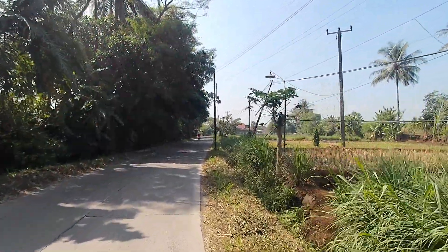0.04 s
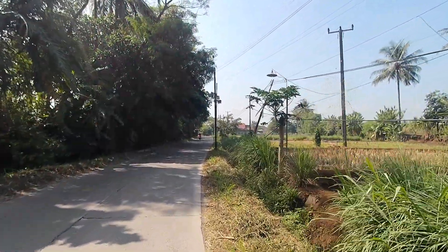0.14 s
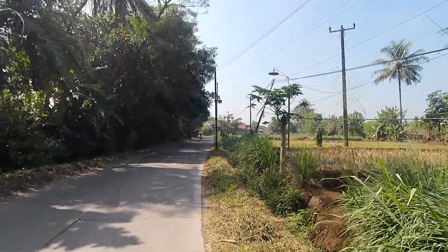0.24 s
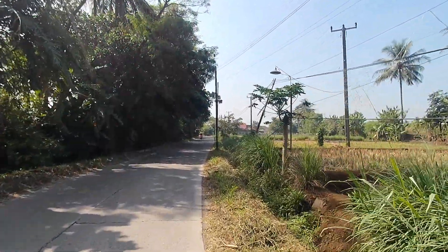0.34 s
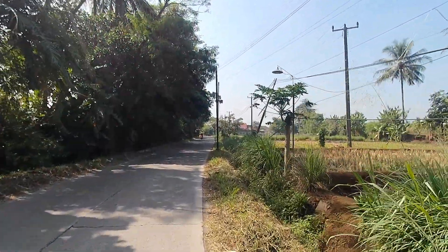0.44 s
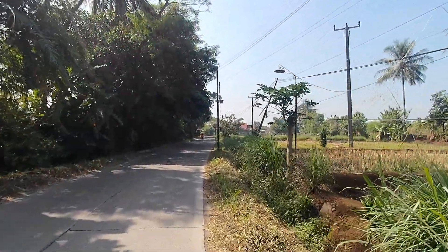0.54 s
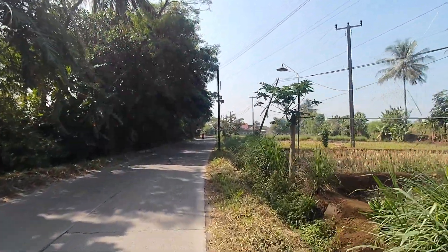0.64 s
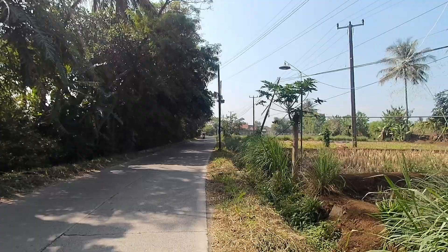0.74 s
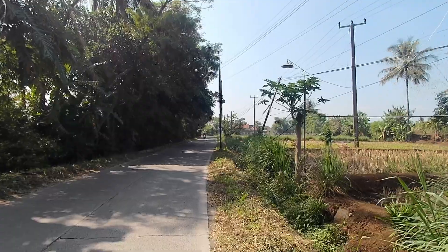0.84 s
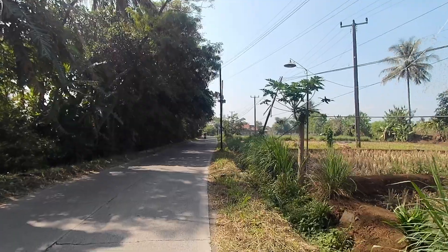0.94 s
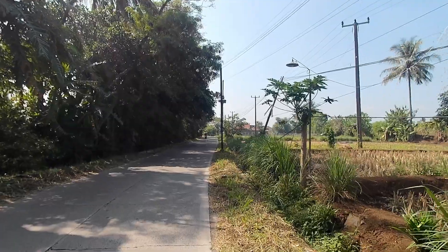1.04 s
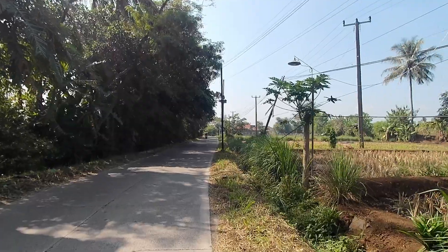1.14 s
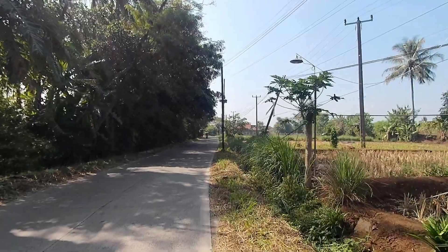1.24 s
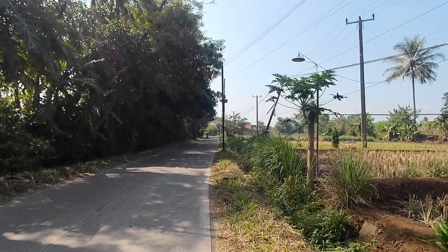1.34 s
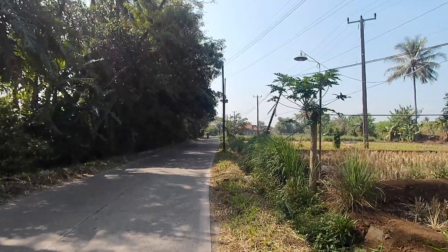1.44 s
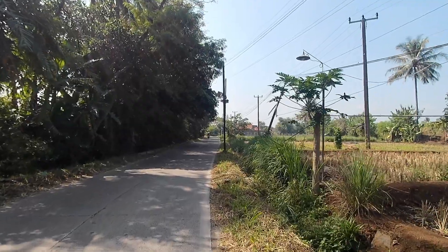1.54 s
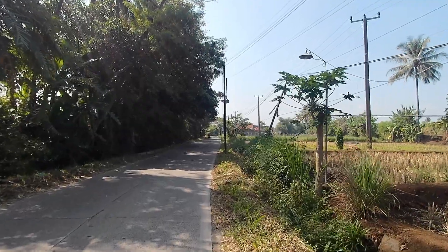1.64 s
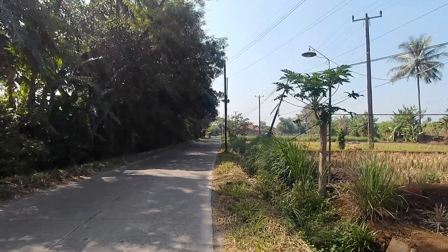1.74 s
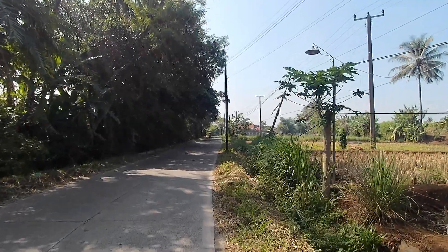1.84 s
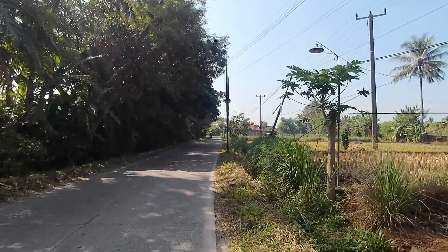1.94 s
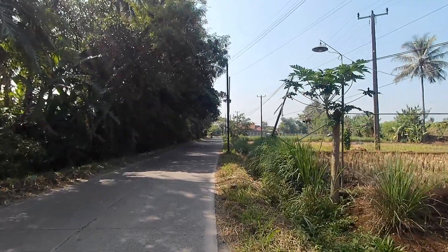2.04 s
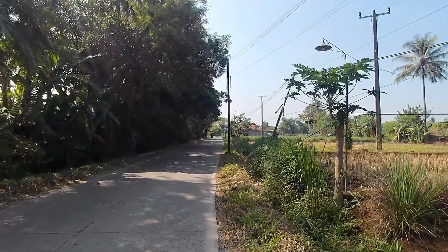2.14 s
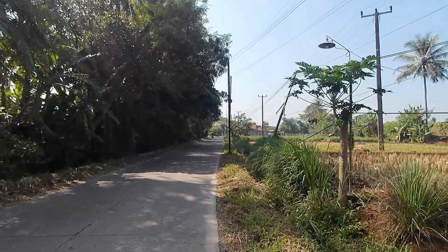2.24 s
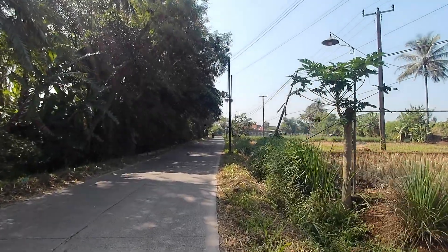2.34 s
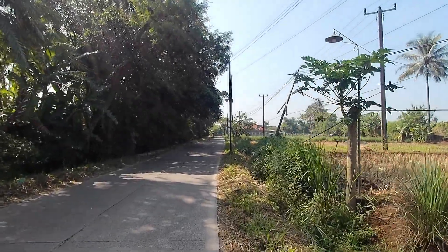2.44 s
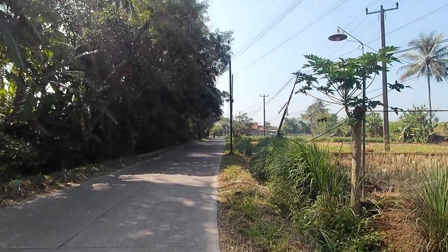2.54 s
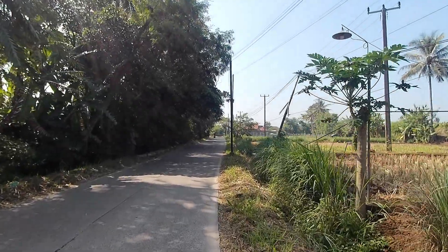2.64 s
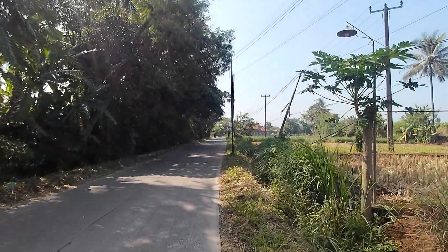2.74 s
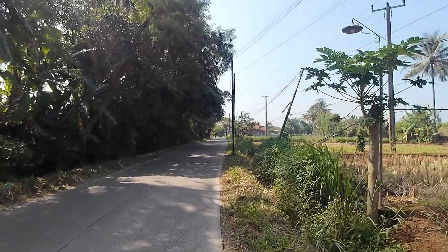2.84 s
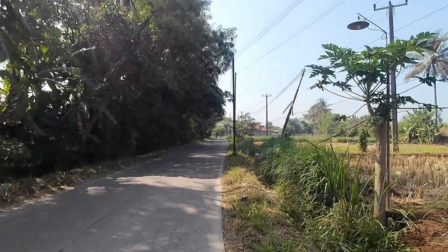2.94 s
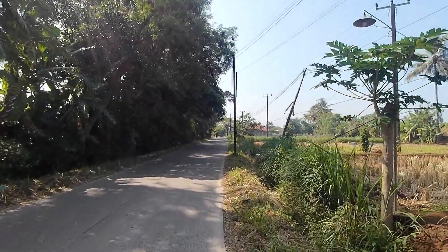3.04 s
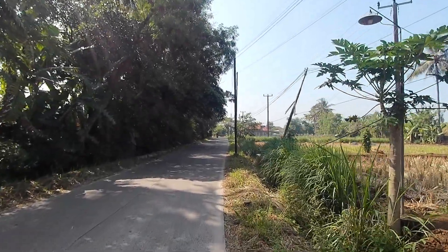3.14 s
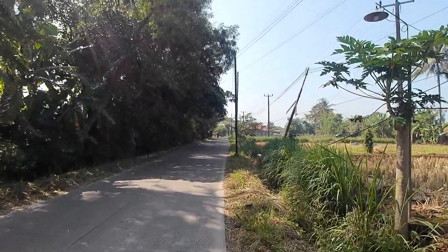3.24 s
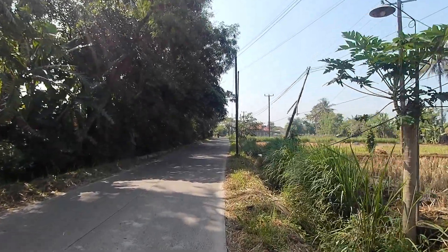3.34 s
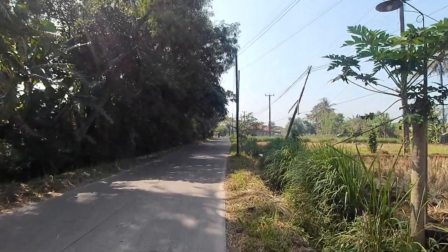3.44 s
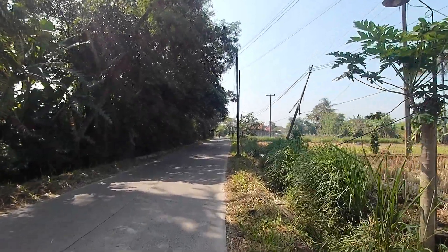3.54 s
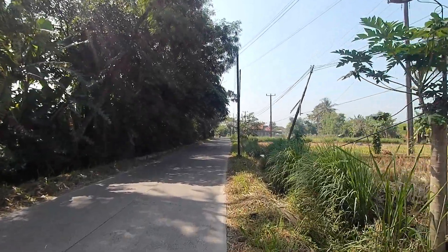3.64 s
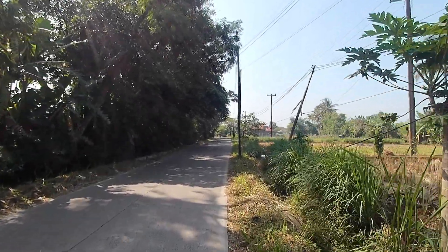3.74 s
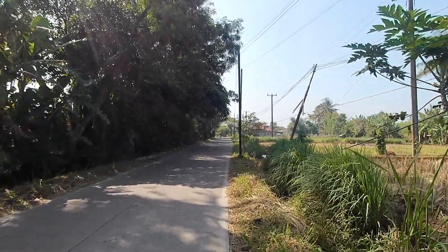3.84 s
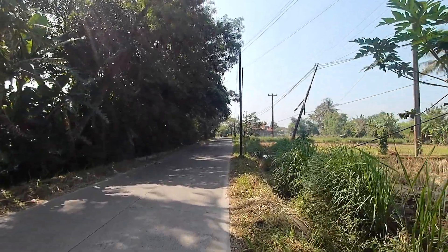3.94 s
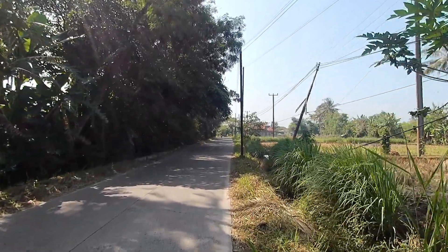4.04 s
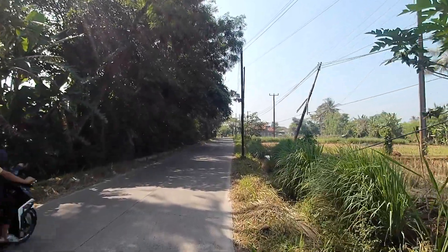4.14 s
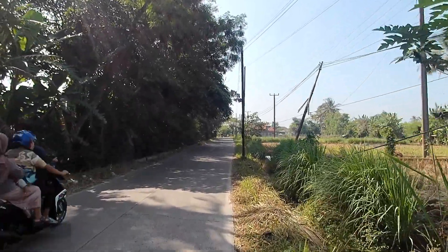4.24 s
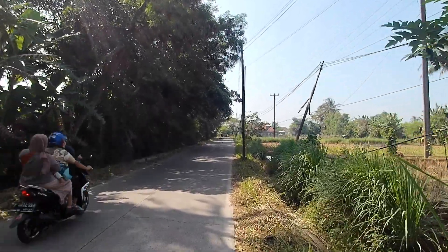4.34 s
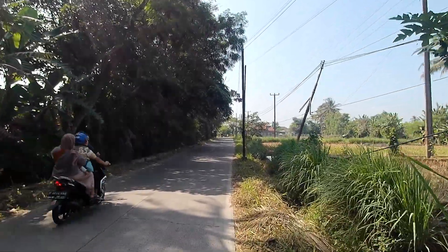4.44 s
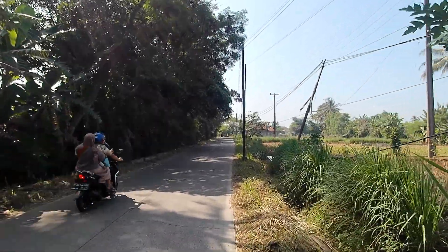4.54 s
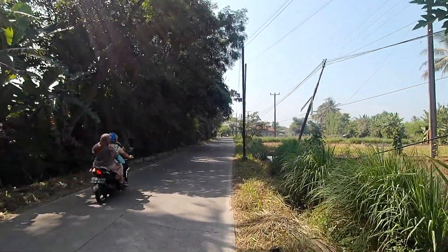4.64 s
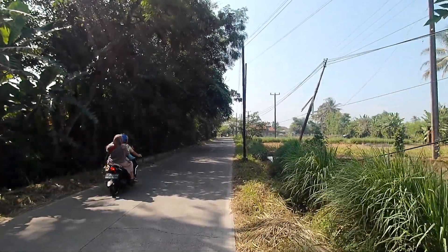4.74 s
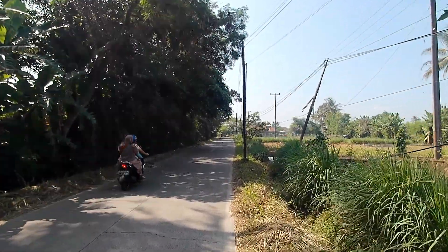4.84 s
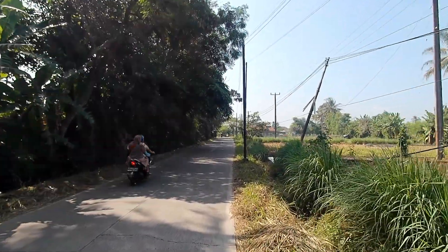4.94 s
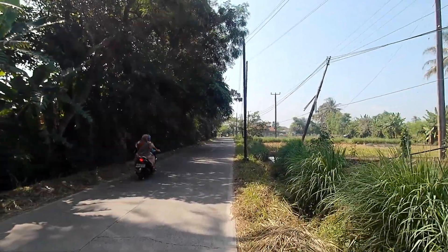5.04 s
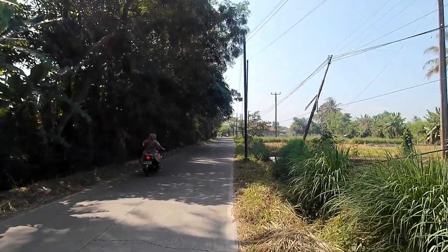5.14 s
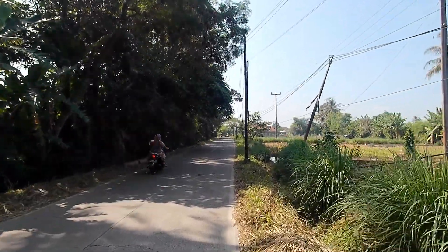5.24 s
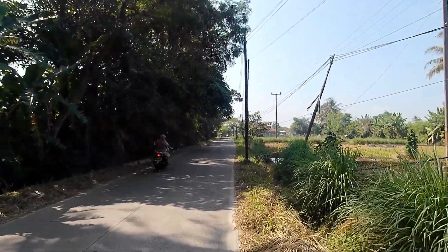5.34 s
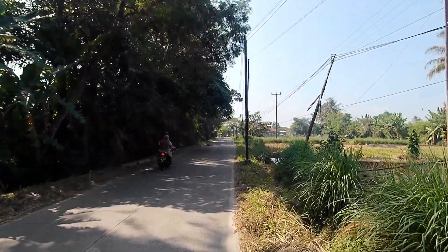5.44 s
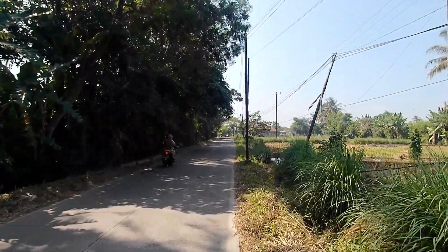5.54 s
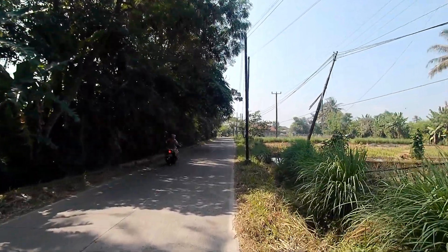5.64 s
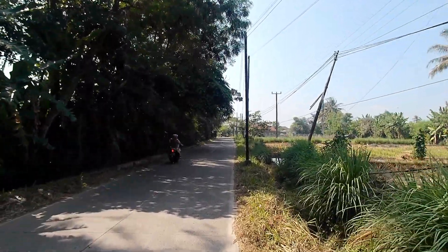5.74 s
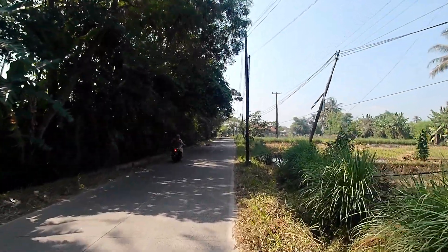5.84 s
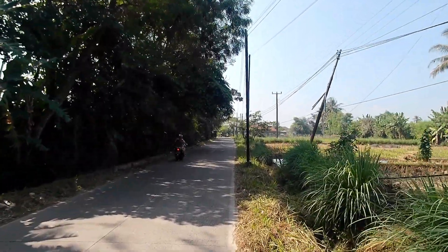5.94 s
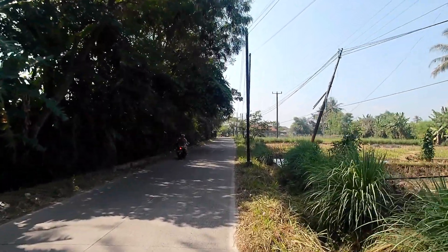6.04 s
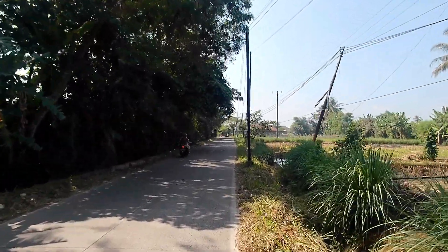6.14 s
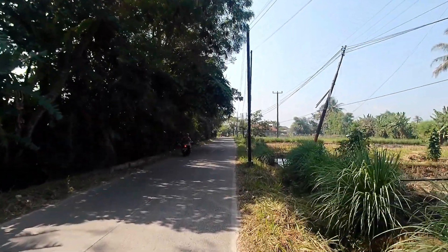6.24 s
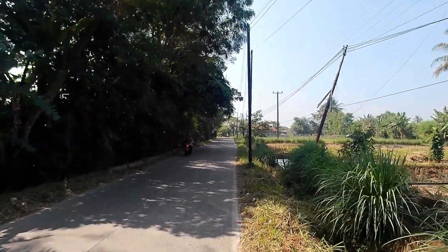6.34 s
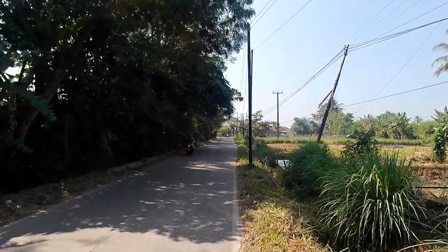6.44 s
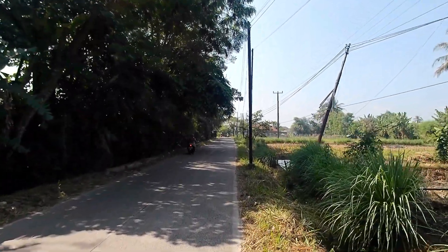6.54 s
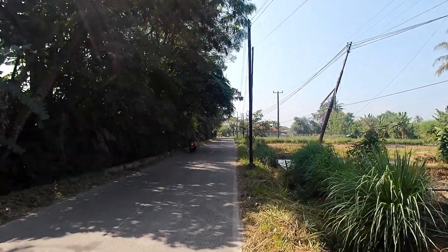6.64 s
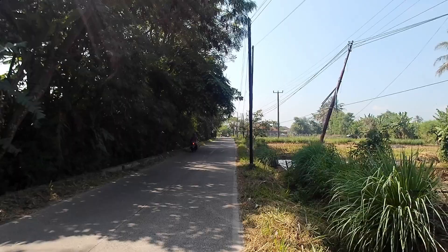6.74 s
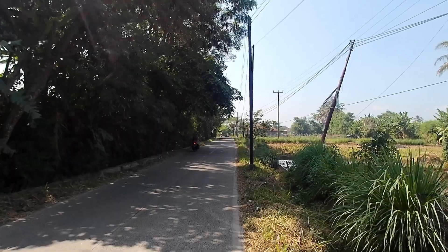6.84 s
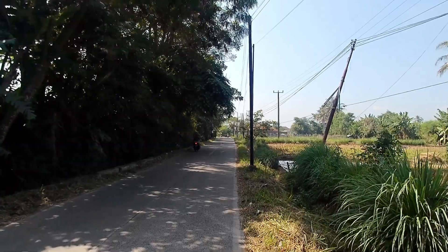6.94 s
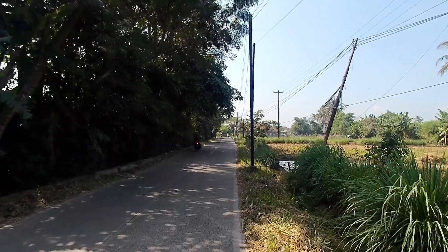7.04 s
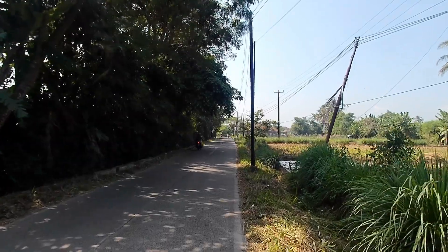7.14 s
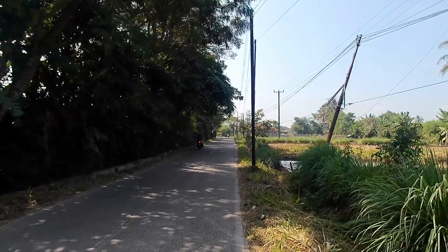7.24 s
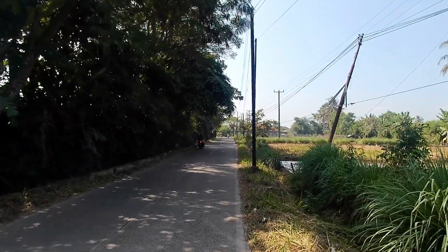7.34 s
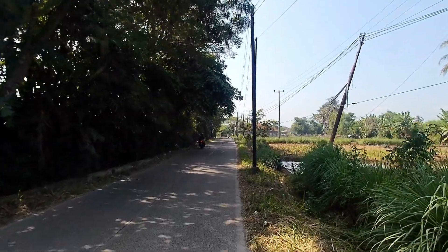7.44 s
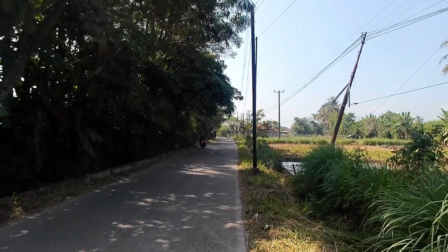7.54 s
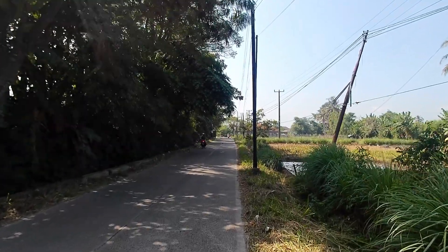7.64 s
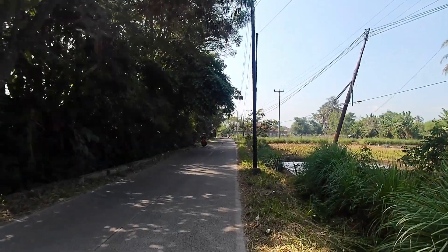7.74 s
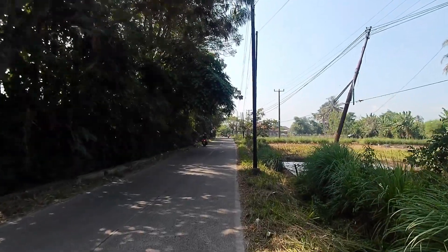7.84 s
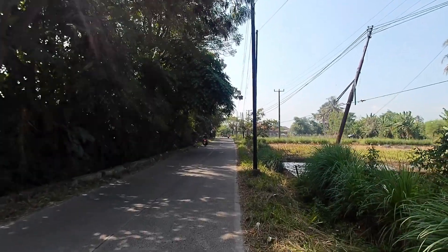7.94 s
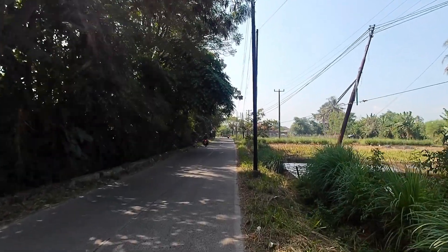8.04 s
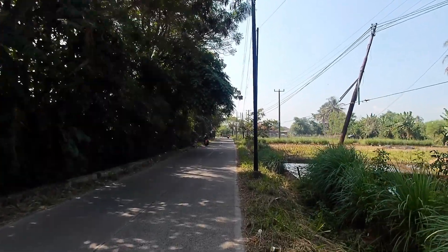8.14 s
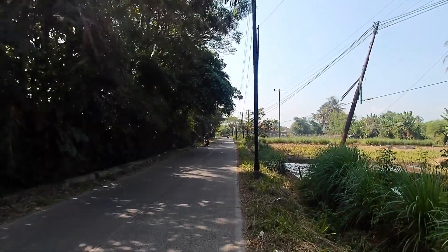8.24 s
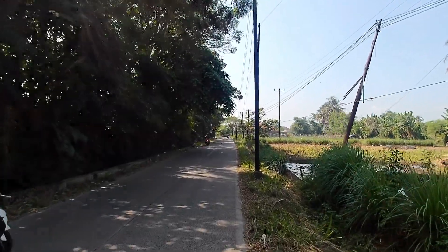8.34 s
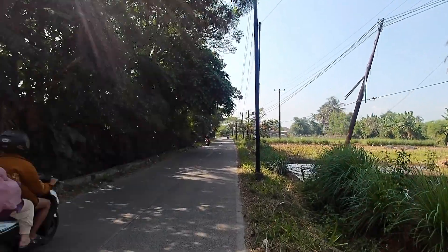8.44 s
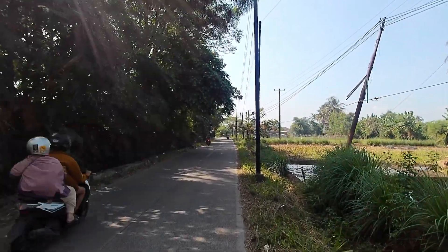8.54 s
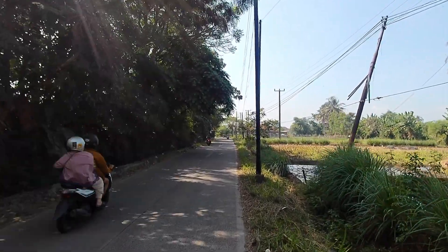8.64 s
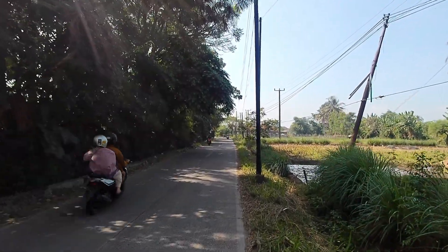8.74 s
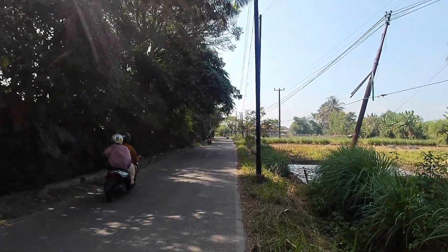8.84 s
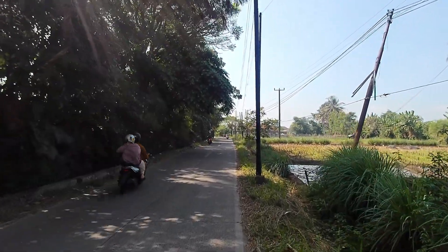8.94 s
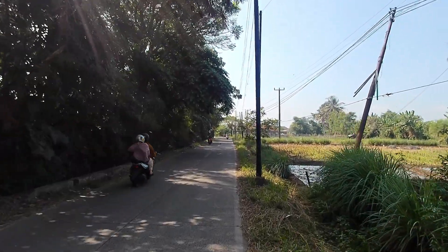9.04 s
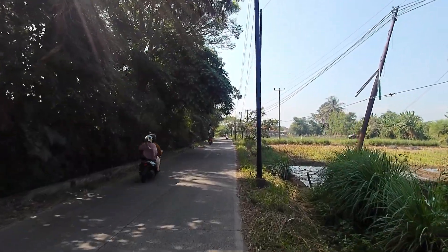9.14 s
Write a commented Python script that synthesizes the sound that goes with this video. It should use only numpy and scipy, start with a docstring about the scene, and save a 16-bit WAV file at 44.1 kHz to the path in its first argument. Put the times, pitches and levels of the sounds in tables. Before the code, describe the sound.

A soft, low outdoor rumble runs throughout on a country road, heard through a nearly mono microphone. From the start a motor scooter approaches, its low engine hum growing with a thin gear whine. A light gust brushes the microphone at about 0.7 seconds, and a bird gives two faint falling whistles at about 1.1 and 2.6 seconds. Dry grass and grit tick faintly here and there, with one sharper click at 3.5 seconds. The scooter passes close at about 3.9 seconds with a booming engine, a rush of tyres and a rattling hiss. Its pulsing exhaust then fades into distant tyre noise. From about 7 seconds a second scooter swells up, passing close at about 8.2 seconds with a similar clatter and hiss and slightly louder tyres. Its exhaust is still puttering away at the end, around 9 seconds.

```python
"""A motor scooter nears a walker on a country road, its air intake booming and its gears whining.
A gust brushes the microphone, a bird calls twice and dry grass ticks. Near 3.9 s the scooter goes by
with a rattling hiss, then its pulsing exhaust pipe is heard, fading into the roar of tyres.
A second scooter overtakes the same way near 8.2 s and rides off. All along the fields rumble softly,
and the nearly mono microphone cuts deep, narrow notches out of the sound."""
import sys
import numpy as np
from scipy import signal
from scipy.fft import rfft, irfft, next_fast_len
from scipy.io import wavfile
from scipy.ndimage import uniform_filter1d

SR = 44100
rng = np.random.default_rng(int(sys.argv[2]) if len(sys.argv) > 2 else 0)


def log_audio(samples):
    """Write samples as a 16-bit WAV file to the path given in sys.argv[1]."""
    # one column per channel
    frames = np.atleast_2d(samples).T
    # limit to full scale, then quantise
    limited = np.clip(frames, -1, 1)
    pcm = np.round(limited * 32767).astype(np.int16)
    wavfile.write(sys.argv[1], SR, pcm)


N = 405279
T = np.arange(N) / SR
HZ = np.fft.rfftfreq(1024, 1 / SR)  # noise is shaped at these frequencies, in short frames
FRAME_S = np.arange(N // 256 + 5)[:, None] * 256 / SR
PASS_S = (3.862, 8.21)  # when each scooter is closest

# engine speed: (time [s], firing rate [Hz])
FIRST_SPEED = [(0, 33.1), (2.7, 32.8), (3.25, 34), (3.7, 34), (4.2, 33.5), (6.2, 33.4), (9.19, 32.3)]
SECOND_SPEED = [(1.4, 36.6), (2, 38.3), (4, 38.4), (5.6, 36.9), (6.4, 36.9), (7.1, 38.1), (7.9, 37.9),
                (8.5, 36.9)]
# each rider's throttle: (time [s], level added to the intake boom [dB])
FIRST_THROTTLE = [(1.0, 0.5), (2.4, 3), (2.75, -4), (3.05, -1), (5.5, -.5), (7.2, 3)]
SECOND_THROTTLE = [(5.1, -19), (5.6, -4), (6.3, 2), (6.7, -3), (8.0, 0)]
# tones of the air intake and exhaust pipe: (multiple of the firing rate, relative level [dB])
FIRST_INTAKE = [(1, -12.5), (2, 0), (3, -21)]
SECOND_INTAKE = [(1, -5.5), (2, 0), (3, -16)]
FIRST_PIPE = [(3, -10), (4, -3), (5, -4.5), (6, -8), (7, -13.5), (8, -20), (9, -23), (10, -22), (12, -24)]
SECOND_PIPE = [(3, -15.5), (4, -6), (5, -3.5), (6, -1.5), (7, -9.5), (8, -22.5), (9, -31.5), (10, -27),
               (11, -53.5)]
# tone colour of each noise: (frequency [Hz], relative level [dB])
TYRES = [(35, -28), (110, -4.5), (200, -12.5), (300, -15.5), (430, -10.5), (700, -10), (1000, -2.5),
         (1130, -0.5), (1230, 2.5), (1390, 2), (1520, -8), (1800, -13.5), (2300, -14.5), (4000, -68),
         (8000, -40.5)]
CLATTER = [(100, -10), (300, -2.5), (420, 3.5), (650, -15.5), (1050, 7), (1700, -21), (2300, 4.5),
           (2600, 0.5), (2850, -2), (3500, -13.5), (5500, -16), (8000, -25), (15000, -44)]
BELT = [(2500, -16), (3050, 8), (3300, 6), (3750, -7.5), (4200, 7), (4500, 3.5), (4900, -3), (5500, -28),
        (6500, -27)]
PULLEY = [(2850, -23), (3250, 3), (3600, 3.5), (4100, -33)]  # a thin rasp, probably the drive pulleys, heard from well ahead
WHISTLE = [(5100, -40), (5450, -5), (5650, 0), (5800, -3), (6050, -35)]  # breathy, heard only while a scooter is alongside
HISS = [(2000, -6.5), (3300, -12), (4400, -25), (5650, -15.5), (6400, -9), (7000, 1), (7550, -2),
        (8450, 2.5), (9100, 2), (9800, -7), (11500, -30), (13600, -12), (15500, -34)]
FIZZ = [(7000, -26), (9500, 7), (11000, -5), (12600, -20.5), (13700, 15), (14500, 5.5), (15500, -8)]
FIELDS = [(28, -15), (58, 5), (110, 4.5), (200, -1.5), (300, -33), (420, -4.5), (700, -7), (1500, -10),
          (2500, -14), (3500, -13.5), (4400, -15), (5500, -22), (8000, -26.5), (12500, -33), (14200, -25),
          (15500, -37)]
# how the tyre roar broadens close by: (frequency [Hz], added level [dB])
CLOSE_TYRES = [(100, 1.5), (300, 4.5), (700, -2), (1020, 1), (1200, 0.5), (1380, -1), (1600, 3.5),
               (2000, -5)]
# the first scooter's transmission whine: (time [s], pitch [Hz])
WHINE_PITCH = [(.6, 1393), (2, 1386), (2.5, 1345), (3, 1352), (4.5, 1242)]
# the tones in that whine: (share of its pitch, relative level [dB])
WHINE_TONES = [(1, -2.5), (0.99, 3), (.894, -1.5)]
# falling bird notes: (time [s], length [s], start pitch [Hz], end pitch [Hz], level [dB])
BIRD_NOTES = [(1.095, 0.15, 4460, 4020, -51), (2.646, 0.18, 4600, 4000, -49)]
# grit and dry grass: (time [s], level [dB], centre [Hz], width [octaves], decay [s])
TICKS = [(0.66, -53.5, 9900, .45, 0.005), (1.417, -54, 14400, .1, .006), (1.985, -62, 8920, .3, .006),
         (2.837, -58, 8930, .35, 0.0076), (3.10, -60, 8770, 0.28, .01), (3.514, -24, 1500, 0.59, 0.00093),
         (6.985, -62, 12000, .5, 0.0073), (7.646, -53, 7360, 0.14, 0.014)]
# narrow bands the microphone loses: (centre [Hz], width [Hz], depth [dB])
MIC_NOTCHES = [(545, 145, -16.5), (1992, 99, -26), (3018, 216, -25.5), (4030, 101, -51), (4994, 387, -40.5),
               (6100, 404, -32)]

# Each part is loudest lag_s after the pass (late if it faces backwards) and stays loud for about width_s.
# A bigger rise or fall makes that slope steeper; first_db and second_db are each scooter's peak gain.
INTAKE_SWELL = dict(lag_s=-0.092, width_s=0.47, rise=1.09, fall=1.04, first_db=-30.5, second_db=-31.5)
PIPE_SWELL = dict(lag_s=0.26, width_s=0.47, rise=1.57, fall=0.82, first_db=-37, second_db=-34.5)
TYRE_SWELL = dict(lag_s=-0.06, width_s=0.23, rise=0.84, fall=0.55, first_db=-33.5, second_db=-30.5)
CLATTER_SWELL = dict(lag_s=0.058, width_s=0.23, rise=1.82, fall=1.49, first_db=-36.5, second_db=-34.5)
BELT_SWELL = dict(lag_s=0.32, width_s=0.39, rise=2.46, fall=1, first_db=-47.5, second_db=-48)
PULLEY_SWELL = dict(lag_s=0.15, width_s=0.15, rise=0.42, fall=2.5, first_db=-51, second_db=-65)
WHISTLE_SWELL = dict(lag_s=0.14, width_s=0.13, rise=2.1, fall=1.44, first_db=-51.5, second_db=-51)
HISS_SWELL = dict(lag_s=0.21, width_s=0.28, rise=2.57, fall=1.164, first_db=-39, second_db=-39.5)
FIZZ_SWELL = dict(lag_s=-0.1, width_s=0.11, rise=2.3, fall=0.73, first_db=-50, second_db=-51.5)


def engine(speed, throttle, intake_gain, pipe_gain, intake, pipe, smear, flutter, rough):
    """A one-cylinder four-stroke booms and rings its pipe. Returns the sound and a count of firings."""
    firings = np.cumsum(follow(speed) * (1 + flutter * wander(8.5))) / SR
    # each intake stroke sucks the pressure down
    boom = -sum(gain_of(db) * np.cos(2 * np.pi * k * firings) for k, db in intake)
    blow = firings + 1 / 8  # the exhaust blows just ahead of the intake
    # the silencer delays each overtone differently, which smears the pulse
    pulses = sum(gain_of(db) * np.cos(2 * np.pi * k * blow + smear * k ** 2) for k, db in pipe)
    uneven = 1 + rough * wander(42)  # no two firings are equally strong
    sound = intake_gain * gain_of(follow(throttle)) * boom + pipe_gain * uneven * pulses
    return np.sqrt(2) * sound, firings


def running_noise(firings):
    """Tyres roar, the engine clatters, and belt and pipe rasp and hiss towards the rear."""
    t = seconds_from_pass()
    along = t / 0.44  # place on the road, in units of the passing distance
    nearness = 1 / np.hypot(1, along)
    doppler = 1 - 0.025 * along * nearness  # pitch is higher coming, lower going
    echo_db = road_echo(strength=0.031, lag_s=0.000517, nearness=nearness)
    ripple_db = panel_ripple(depth_db=2.4, doppler=doppler)
    tyres = noise(TYRES, (700, 1700), nearness * level_at(CLOSE_TYRES, HZ), patchy_db=0.84)
    tyres *= both_swells(TYRE_SWELL, far_db=-46.5)
    clatter = noise(CLATTER, (2100, 2900), echo_db + ripple_db * (HZ > 1500), patchy_db=2.0)
    clatter *= both_swells(CLATTER_SWELL, far_db=-72.5)
    belt = noise(BELT, (4100, 4800), ripple_db, patchy_db=2.6) * both_swells(BELT_SWELL)
    pulley = noise(PULLEY, colour_db=ripple_db, patchy_db=2.0) * both_swells(PULLEY_SWELL)
    whistle = noise(WHISTLE, colour_db=ripple_db, slide=doppler) * both_swells(WHISTLE_SWELL)
    # the hiss lifts in pitch just before a scooter draws level, then dips as its tail goes by
    lift = 0.15 * closeness(t + 0.27, width_s=0.13) ** 2
    dip = 0.068 * closeness(t - 0.14, width_s=0.2)
    swish_db = swish()
    hiss = noise(HISS, (6500, 9500), echo_db + ripple_db + swish_db, patchy_db=3, slide=0.98 + lift - dip)
    hiss *= both_swells(HISS_SWELL)
    fizz = noise(FIZZ, (13000, 15400), ripple_db + swish_db, patchy_db=3.5)
    fizz *= both_swells(FIZZ_SWELL, far_db=-73)
    rattling = gain_of(0.99 * wander(68)) * (belt + pulley + whistle + hiss)
    throbbing = throb(firings, firing_depth=0.025, crank_depth=0.018) * (tyres + clatter + rattling)
    return throbbing + fizz * gain_of(1.1 * wander(40))


def throb(firings, firing_depth, crank_depth):
    """Noise swells with each firing and with each of the two crank turns between firings."""
    phase = 2 * np.pi * firings
    return unit_rms(np.exp(firing_depth * np.cos(phase) + crank_depth * np.cos(2 * phase)))


def gear_whine(firings, whine_db=-52.5, teeth_db=-53, beam_db=-31):
    """The first scooter's transmission: a sagging whine, and gear teeth singing 36 times per firing."""
    phase = 2 * np.pi * np.cumsum(follow(WHINE_PITCH) * (1 + 0.0014 * wander(9.4))) / SR
    tones = sum(gain_of(db + 2.04 * wander(4.6)) * np.sin(share * phase) for share, db in WHINE_TONES)
    fade = np.clip(WHINE_PITCH[-1][0] - T, 0, 0.5) * 2
    teeth = np.sin(2 * np.pi * 36 * firings)
    t = T - PASS_S[0] - 0.06
    carry = gain_of(teeth_db) * closeness(t, width_s=3.5) ** 2
    beam = gain_of(beam_db) * closeness(t, width_s=0.04) ** 2  # beamed sideways, so heard for an instant
    return np.sqrt(2) * (gain_of(whine_db) * fade * tones + (carry + beam) * teeth)


def swell(lag_s, width_s, rise, fall, first_db, second_db):
    """A part grows louder as it nears and softer as it leaves: one row of gains for each scooter."""
    t = T - np.array(PASS_S)[:, None] - lag_s
    return gain_of([[first_db], [second_db]]) * closeness(t, width_s) ** np.where(t < 0, rise, fall)


def both_swells(part, far_db=-np.inf):
    """The gain of one part on both scooters together, over a steady distant level."""
    return np.sqrt((swell(**part) ** 2).sum(0) + gain_of(far_db) ** 2)


def swish():
    """A reflection cancels a band of hiss: first one from the scooter's front, then its tail (dB)."""
    t = seconds_from_pass()
    front = sweeping_notch(far_hz=8800, sink=0.29, lead_s=0.13, span_s=0.19, width_hz=560, depth_db=-3.5)
    tail = sweeping_notch(far_hz=11470, sink=0.25, lead_s=0.056, span_s=0.31, width_hz=480, depth_db=-8.5)
    tail_share = (1 + np.tanh((t + 0.031) / 0.042)) / 2
    return (1 - tail_share) * front * closeness(t, width_s=0.71) + tail_share * tail


def sweeping_notch(far_hz, sink, lead_s, span_s, width_hz, depth_db):
    """A quiet band that slides down as a scooter nears and back up as it leaves (dB)."""
    centre_hz = far_hz * (1 - sink * closeness(seconds_from_pass() + lead_s, span_s))
    return depth_db * np.exp(-((HZ - centre_hz) / width_hz) ** 2)


def panel_ripple(depth_db, doppler):
    """Covers and fins ring at many narrow pitches, all shifted together by the motion (dB)."""
    grid_hz = np.arange(0, SR / 2, 25)
    ripple = unit_rms(uniform_filter1d(rng.standard_normal(len(grid_hz)), size=5))
    return depth_db * np.interp(HZ / doppler, grid_hz, ripple)


def road_echo(strength, lag_s, nearness):
    """The bounce off the road lifts some pitches and dulls others; it lags most close by (dB)."""
    bounce = strength * nearness * np.exp(2j * np.pi * HZ * lag_s * nearness)
    return 20 * np.log10(abs(1 + bounce))


def bird():
    """Thin whistles from the trees, each with a quick upward flick and a long fall."""
    out = np.zeros(N)
    for start_s, length_s, start_hz, end_hz, db in BIRD_NOTES:
        progress = np.arange(0, 1, 1 / (length_s * SR))
        flick = 300 * np.exp(-progress / 0.066)
        hz = start_hz + (end_hz - start_hz) * progress - flick + 30 * wander(90)[:len(progress)]
        note = np.sin(2 * np.pi * np.cumsum(hz) / SR) * signal.windows.tukey(len(hz), 0.4)
        add(out, start_s, gain_of(db) * unit_rms(note))
    return out


def ticks():
    """Grit and dry grass tick: short bursts of noise, each in its own band."""
    out = np.zeros(N)
    t = T[:4096]
    hz = np.fft.rfftfreq(len(t), 1 / SR) + 1
    for start_s, db, centre_hz, octaves, decay_s in TICKS:
        band = np.exp(-(np.log2(hz / centre_hz) / octaves) ** 2 / 2)
        burst = unit_rms(irfft(rfft(rng.standard_normal(len(t))) * band))
        envelope = t / decay_s * np.exp(1 - t / decay_s)
        add(out, start_s, gain_of(db) * burst * envelope)
    return out


def wind(start_s=0.69, attack_s=0.054, hold_s=0.15, decay_s=0.078, gust_db=-47.5, breeze_db=-58.5):
    """Air rumbles on the microphone: one gust over a faint breeze."""
    t = T - start_s
    gust = np.clip(t / attack_s, 0, 1) * np.exp(-np.maximum(t - attack_s - hold_s, 0) / decay_s)
    rumble = noise([(15, 0), (35, 17), (60, 2), (90, 10), (160, -30), (400, -30), (2000, -80)])
    return rumble * (gain_of(breeze_db) + gain_of(gust_db) * gust)


def countryside():
    """Fields rumble far off, dry grass rustles, one high tone wavers and one flutters like an insect."""
    fields = noise(FIELDS, patchy_db=2.1) * gain_of(-50)
    grass = noise([(5000, -40), (7000, -25), (10000, 3.5), (15000, 0)])
    grass *= gain_of(-68 + 4.5 * np.tanh(wander(25)))  # faint, uneven spurts
    wavering = np.sin(2 * np.pi * np.cumsum(14641 + 10 * wander(20)) / SR)
    fluttering = wander(70) * np.sin(2 * np.pi * 11650 * T)
    wavering *= gain_of(-68 + 3.5 * wander(25))
    fluttering *= gain_of(-77.5 + 3.7 * wander(10))
    return fields + grass + wavering + fluttering


def noise(spectrum, band_hz=(0, SR), colour_db=0, patchy_db=0, slide=1):
    """Shaped noise with drifting patches, of strength 1 inside the band; slide scales its pitch."""
    real, imaginary, patches = rng.standard_normal((3, len(FRAME_S), len(HZ)))
    patches = uniform_filter1d(patches, size=9, axis=0)
    patches = unit_rms(uniform_filter1d(patches, size=10, axis=1))
    shape_db = level_at(spectrum, HZ / slide) + colour_db + patchy_db * patches
    frames = (real + 1j * imaginary) * gain_of(shape_db)
    power = (abs(frames) ** 2).mean(0)
    band_share = power[(HZ >= band_hz[0]) & (HZ <= band_hz[1])].sum() / power.sum()
    sound = signal.istft(frames.T, nperseg=1024, noverlap=768)[1][:N]
    return unit_rms(sound) / np.sqrt(band_share)


def wander(rate_hz):
    """Smooth random motion of strength 1; a higher rate moves faster."""
    size = next_fast_len(N, True)
    hz = np.fft.rfftfreq(size, 1 / SR)
    smoothed = rfft(rng.standard_normal(size)) * np.exp(-(hz / rate_hz) ** 2)
    return unit_rms(irfft(smoothed, size)[:N])


def seconds_from_pass():
    """Each frame's time from the nearer pass; negative while a scooter is still coming."""
    return FRAME_S - np.where(FRAME_S < np.mean(PASS_S), PASS_S[0], PASS_S[1])


def closeness(t, width_s):
    """One over the distance to something moving along a straight road; 1 at t = 0."""
    return 1 / np.hypot(1, t / width_s)


def gain_of(db):
    """Turns decibels into a factor to multiply by."""
    return 10 ** (np.asarray(db) / 20)


def unit_rms(x):
    """Scales a signal so its average strength (rms) is 1."""
    return x / np.sqrt(np.mean(x ** 2) + 1e-20)


def level_at(spectrum, hz):
    """A tone colour table's level (dB) at the given frequencies."""
    table_hz, db = np.transpose(spectrum)
    return np.interp(np.log(hz + 1), np.log(table_hz), db)


def follow(curve):
    """Joins (time, value) points with straight lines, one value per sample."""
    return np.interp(T, *np.transpose(curve))


def add(mix, start_s, sound):
    """Mixes a sound in at the given time."""
    part = mix[round(start_s * SR):][:len(sound)]
    part += sound[:len(part)]


def scene():
    """Both scooters and the roadside, nearly the same in both ears."""
    intake = swell(**INTAKE_SWELL)
    pipe = np.hypot(swell(**PIPE_SWELL), gain_of(-64))  # the exhaust note carries far down the road
    first, first_firings = engine(FIRST_SPEED, FIRST_THROTTLE, intake[0], pipe[0],
                                  FIRST_INTAKE, FIRST_PIPE, smear=0.45, flutter=0.00157, rough=0.038)
    second, second_firings = engine(SECOND_SPEED, SECOND_THROTTLE, intake[1], pipe[1],
                                    SECOND_INTAKE, SECOND_PIPE, smear=0.65, flutter=0.0038, rough=0.049)
    nearest_firings = np.where(T < np.mean(PASS_S), first_firings, second_firings)
    scooters = first + second + running_noise(nearest_firings) + gear_whine(first_firings)
    mid = scooters + bird() + ticks() + wind() + countryside()
    treble = signal.sosfilt(signal.butter(6, 2800, "high", fs=SR, output="sos"), mid)
    side = gain_of(-23) * wander(60) * treble  # the treble flickers a little between the ears
    return np.array([mid + side, mid - side])


def record(dry):
    """The microphone cuts its narrow notches, then everything above 15.5 kHz is removed."""
    hz = np.fft.rfftfreq(N, 1 / SR)
    notch_db = sum(db / (1 + (2 * (hz - centre) / width) ** 2) for centre, width, db in MIC_NOTCHES)
    notched = irfft(rfft(dry) * gain_of(notch_db), N)
    low_pass = signal.firwin(701, 15500, window=("kaiser", 9), fs=SR)
    return signal.oaconvolve(notched, low_pass[None], "same")


dry = scene()
out = record(dry)
log_audio(out)
```